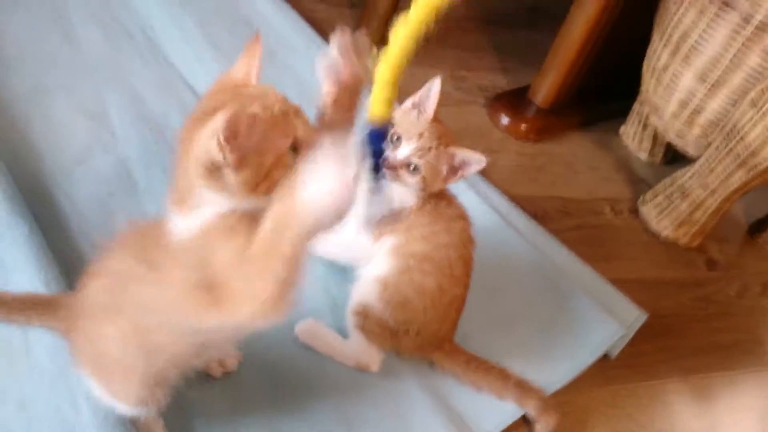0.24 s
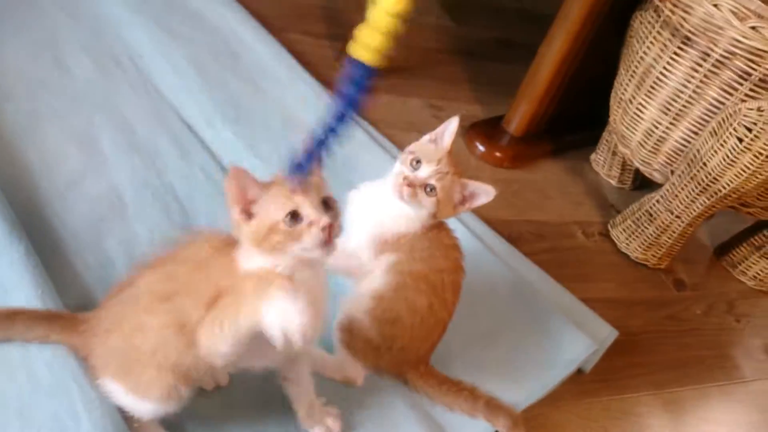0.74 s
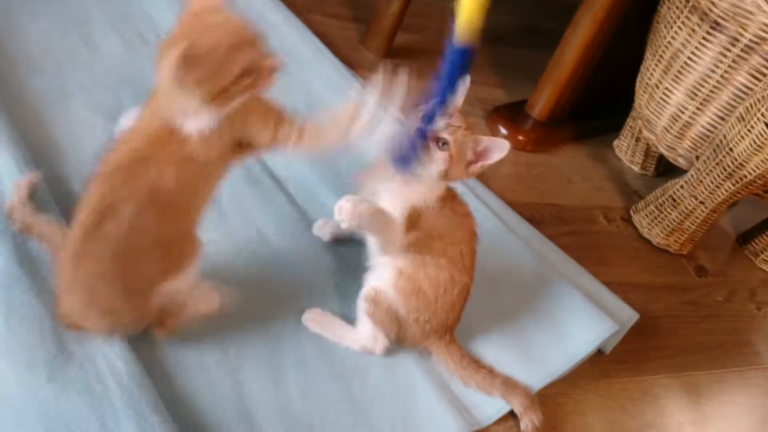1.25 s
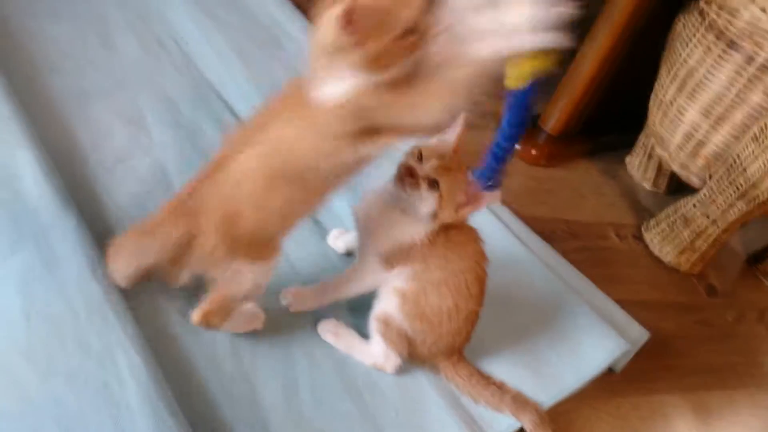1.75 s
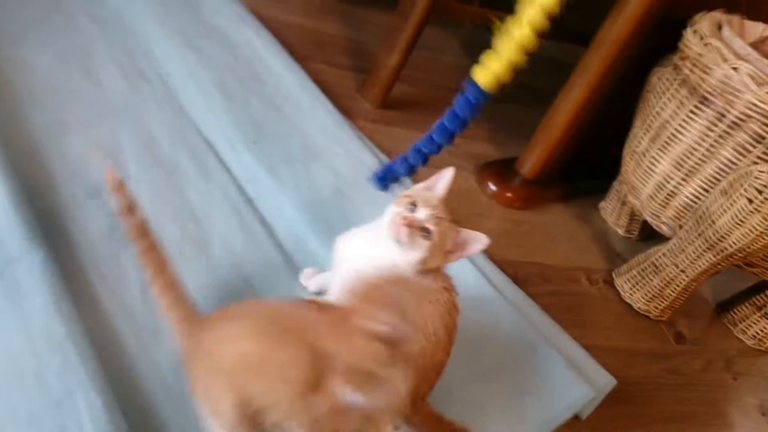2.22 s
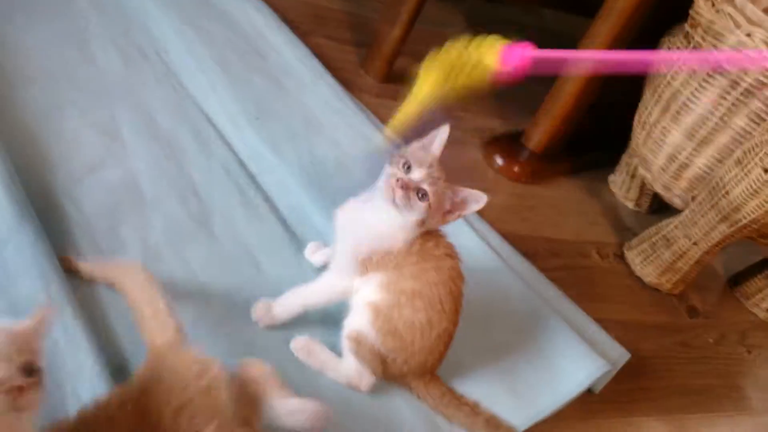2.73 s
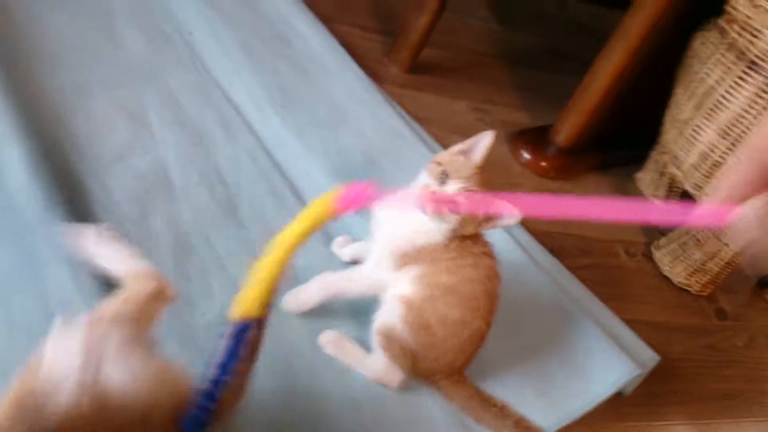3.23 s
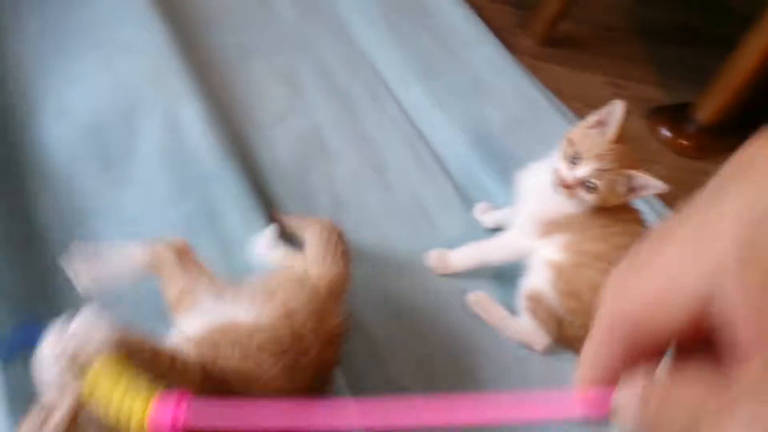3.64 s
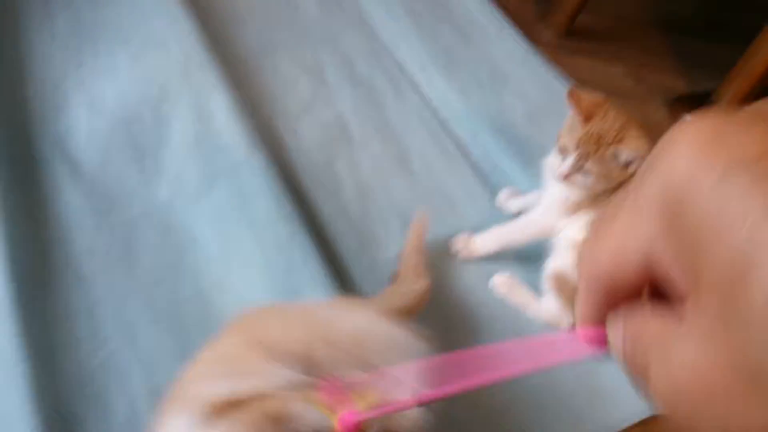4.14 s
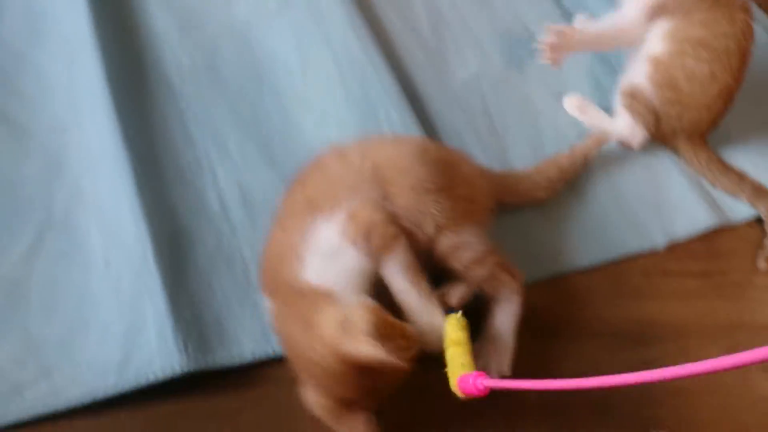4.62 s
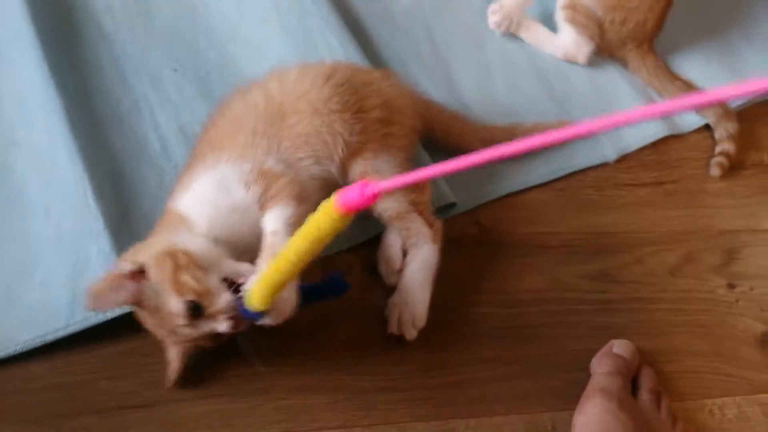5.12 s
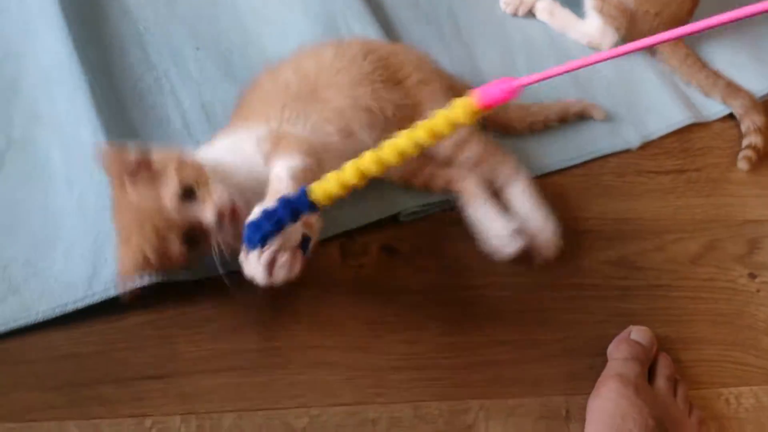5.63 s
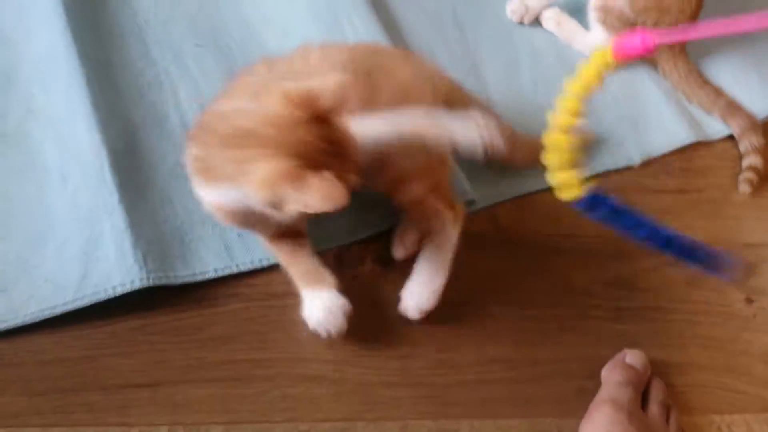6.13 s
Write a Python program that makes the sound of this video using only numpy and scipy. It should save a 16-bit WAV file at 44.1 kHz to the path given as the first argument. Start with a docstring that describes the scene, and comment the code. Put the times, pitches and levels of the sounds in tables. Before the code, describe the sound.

Close stereo pickup in a small, lively room. Faint cloth rustle, then a sudden loud cluster of hard, hollow toy knocks at half a second, another sharp clack near one second and weaker ones until two. After that, irregular claw ticks, brushing strokes of fur on cloth and soft low thumps on floorboards, with the busiest rustling near the end of the fifth second, then calmer.

```python
"""First comes a soft rustle of fur and cloth, and soon the hard cracks and hollow knocks of a wand toy.
Two kittens chase it on a cloth over a wooden floor, in a small, bare-sounding room.
Knocks and claw ticks are noise bursts plus short rings; rustle and scuffs are filtered grains of friction.
Soft landings ring the floorboards; low rumble, patter and steady air lie behind.
A close stereo microphone with a presence peak colours its two sides differently."""
import sys
import numpy as np
from scipy import signal
from scipy.fft import rfft, irfft, next_fast_len
from scipy.io import wavfile

SR = 44100
rng = np.random.default_rng(int(sys.argv[2]) if len(sys.argv) > 2 else 0)


def materialize(psi):
    """Save the field psi as 16-bit PCM at rate SR to the path in sys.argv[1].

    A 1-D psi becomes a single channel; in a 2-D psi each row is a channel.
    """
    bounded = np.clip(np.atleast_2d(psi).T, -1, 1)
    quanta = np.round(bounded * 32767).astype(np.int16)
    wavfile.write(sys.argv[1], SR, quanta)


N = 280917
TIME = np.arange(N) / SR  # seconds

# All levels in the tables are relative; positive left_right_db means louder on the left.

# Knocks of the toy: start_s, level_db, pitch_hz, crack_against_ring_db, left_right_db, room_level_db
TOY_KNOCKS = [(0.4875, -14.5, 1700, 2, 1, -5), (0.5002, -23.5, 1770, -6.5, -2, 2.5),
              (0.5173, -21, 1860, 3, 12, -6.5), (0.526, -23, 1940, -1.5, -16, -9),
              (0.534, -23.5, 1680, -7, 3, -9), (0.747, -41, 1746, -0.5, 7, 3),
              (0.9254, -26, 1980, 2, -9.5, -11), (0.955, -34, 1980, -11, 11, 3),
              (1.2107, -36.5, 1940, -11.5, -9, -4), (1.453, -33, 2020, -9.5, -2, -4.5),
              (1.6398, -29.5, 1735, -13, -6, -1.5), (1.9134, -42, 1780, -5, -5, 0)]
# Colour of the hard crack: frequency_hz, level_db
CRACK_COLOUR = [(250, -20.5), (450, -8.5), (800, -12), (1350, -18), (1650, -2.5), (2400, -0.5), (3300, 5),
                (4200, 2), (5300, 5.5), (6600, -4), (9000, -10), (14500, -8)]
KNOCK_RING_S = 0.0013  # time constant of both the rise and the decay


def knocks(upper_hz=2880, upper_db=-10, crack_room_db=10.5, hard_hz=17000, size=2048):
    """Each knock is a hard crack plus a short hollow ring, with its own pitch and echo pattern."""
    out, t = np.zeros((2, N)), np.arange(size) / SR
    hardest_db = max(row[1] + row[3] for row in TOY_KNOCKS)
    # so small a body radiates little below its own pitch
    small_body = signal.butter(4, 1500, "high", fs=SR, output="sos")
    for start_s, level_db, pitch_hz, crack_db, left_right_db, room_db in TOY_KNOCKS:
        phase = rng.uniform(0, np.pi / 2, (2, 1))
        low_mode = np.sin(2 * np.pi * pitch_hz * t + phase)
        high_mode = from_db(upper_db) * np.sin(2 * np.pi * upper_hz * t + phase)
        swell = np.exp(-t / KNOCK_RING_S) * (1 - np.exp(-t / KNOCK_RING_S))
        ring = signal.sosfilt(small_body, (low_mode + high_mode) * swell)
        ring = from_db(level_db - 3.5) * blow(ring)
        # gentler blows are duller
        softness_db = level_db + crack_db - hardest_db
        top_hz = np.clip(hard_hz * from_db(0.7 * softness_db), 5500, 19000)
        b, a = signal.butter(2, top_hz, fs=SR)
        crack = blow(signal.lfilter(b, a, contact(CRACK_COLOUR, decay_s=0.00093)))
        crack = from_db(level_db + crack_db - 2.5) * crack
        add(out, start_s, ring + crack, left_right_db)
        # the room gets a larger share of the crack
        add(out, start_s, room(from_db(room_db) * (ring + from_db(crack_room_db) * crack)))
    return out


RATTLE_MIDDLE_S, RATTLE_HALF_S, RATTLE_DB = 1.265, 0.035, -57


def rattles():
    """The dangling toy rattles: a loose run of tiny knocks, spread over four pitches."""
    chatter = 0
    for pitch_hz in np.geomspace(1700, 2050, 4):
        b, a = signal.iirpeak(pitch_hz, 10, fs=SR)
        chatter = chatter + signal.lfilter(b, a, fibres(per_s=80, spread_db=1, smooth=0))
    swell = np.exp(-((TIME - RATTLE_MIDDLE_S) / RATTLE_HALF_S) ** 2)
    return from_db(RATTLE_DB) * rms_one(chatter) * swell


# Claw ticks and snags that stand out of the rustle: start_s, level_db, treble_share_db, left_right_db
CLAW_TICKS = [(0.467, -37.5, 2, 3), (0.6708, -25, -4, 2.5), (1.028, -34, -3.5, -1), (1.494, -45, -5, 0),
              (1.587, -37, -9.5, 2), (1.64, -23.5, -11, -1), (1.7461, -31.5, -3.5, 4),
              (1.9898, -34.5, -1.5, 3), (2.107, -38.5, 13.5, 4), (2.205, -41, 0.5, -5),
              (2.282, -42, -2, 2.5), (2.419, -34, 1, -5), (2.503, -39, -19, -4), (2.874, -49, 10, 2),
              (2.9528, -34, -4, 4.5), (3.038, -37.5, -4, -5), (3.059, -39.5, 1, -4),
              (3.1489, -44, 11.5, -5), (3.1759, -34.5, -10, -10), (3.275, -25.5, -1, -2),
              (3.4975, -30, -10, -3), (3.594, -37, -11, -7), (3.693, -44, -5.5, -6), (3.93, -40.5, 7.5, -2),
              (4.0224, -33, 0, 7), (4.049, -31, -5.5, -6), (4.1656, -37.5, 7.5, -3),
              (4.2062, -39.5, 2.5, -4), (4.4212, -31.5, -16, 10), (4.552, -37, -17, -1),
              (4.6632, -36.5, -4, -2), (4.7851, -25.5, -6, 2), (4.808, -34, 4, 1), (4.883, -34, 1.5, -6),
              (4.923, -37, 0, 4), (5.096, -47, -9, 20), (5.176, -36, -16, 2), (5.198, -36.5, -5, 0),
              (5.229, -39.5, 8, 1.5), (5.2622, -30, -8, -3), (5.318, -40, -33, -6), (5.37, -37, -11, 0),
              (5.439, -39.5, -30, -3), (5.5643, -41.5, -25, -3), (5.7843, -38.5, -3, -2.5),
              (5.858, -38.5, -13, 11), (6.098, -42, -16, 8), (6.172, -41.5, 1, 2.5), (6.357, -44.5, 13, 3)]
# Colour of a claw's tap or pluck: frequency_hz, level_db
TICK_COLOUR = [(400, -20.5), (1500, -14), (2900, -11.5), (4300, -4.5), (5200, 0), (6200, -7.5), (9000, -62),
               (15000, -52)]
# Colour of a bright snap, also used for the crisp top of the rustle: frequency_hz, level_db
SNAP_COLOUR = [(2500, -46), (5500, -1), (7000, -7), (8500, -7.5), (10500, -12), (12500, -9.5),
               (15000, -18.5)]


def ticks(ring_hz=5050, ring_s=0.00053, ring_db=-2, dull_rings=0.18, size=2048):
    """Claws tap wood or pluck cloth with a tiny ping, plus a bright tearing snap; gives (taps, snaps)."""
    taps, snaps, t = np.zeros((2, N)), np.zeros((2, N)), np.arange(size) / SR
    for start_s, level_db, treble_db, left_right_db in CLAW_TICKS:
        ping_hz = ring_hz * (1 + 0.02 * rng.standard_normal())
        phase = rng.uniform(0, np.pi / 2, (2, 1))
        ping = blow(np.sin(2 * np.pi * ping_hz * t + phase) * t * np.exp(-t / ring_s))
        # a thread that is plucked and does not tear rings more purely
        ping = from_db(ring_db - dull_rings * treble_db) * ping
        tap = blow(ping + contact(TICK_COLOUR, decay_s=0.0015))
        snap = contact(SNAP_COLOUR, decay_s=0.0014)
        add(taps, start_s, from_db(level_db - 0.5) * tap, left_right_db)
        add(snaps, start_s, from_db(level_db + treble_db - 1.5) * snap, left_right_db)
    return taps, snaps


# Strokes of fur and paws over the cloth: start_s, length_s, level_db
CLOTH_STROKES = [(0.008, 0.13, -49), (0.308, 0.51, -52.5), (0.658, 0.26, -50.5), (1.383, 0.11, -52),
                 (1.747, 0.01, -45.5), (2.093, 0.16, -50.5), (2.274, 0.032, -43.5), (2.43, 0.02, -53),
                 (2.531, 0.16, -47), (2.784, 0.12, -50.5), (3.08, 0.075, -49), (3.148, 0.16, -43),
                 (3.405, 0.25, -51), (3.717, 0.043, -49.5), (3.915, 0.3, -47.5), (4.144, 0.21, -49),
                 (4.414, 0.027, -47), (4.515, 0.068, -47), (4.67, 0.098, -39.5), (4.766, 0.062, -38),
                 (4.889, 0.12, -41), (5.09, 0.22, -52.5), (5.224, 0.18, -53), (5.81, 0.088, -51),
                 (6.133, 0.0099, -54)]
# every stroke grips quickly, eases as the paw slows, then lets go
GRIP_S, EASE_DB_PER_S, LET_GO_DB_PER_S = 0.014, 33, 207
RESTING_RUB_DB = -63.5  # fur keeps stirring between the strokes


def rubbing_db():
    """How hard the cloth is rubbed at each moment: overlapping strokes add their power."""
    power = from_db(RESTING_RUB_DB) ** 2
    for start_s, length_s, level_db in CLOTH_STROKES:
        age = np.maximum(TIME - start_s, 0)
        fade_db = EASE_DB_PER_S * age + LET_GO_DB_PER_S * np.maximum(age - length_s, 0)
        grip = np.minimum(age / GRIP_S, 1)
        power = power + (grip * from_db(level_db - fade_db)) ** 2
    return 10 * np.log10(power)


# Colour of rubbed cloth: frequency_hz, level_db
CLOTH_COLOUR = [(300, -19.5), (1000, -14.5), (2000, -12), (3000, -7), (4300, -2.5), (5300, 1.5),
                (6600, -11.5), (9000, -20.5), (15000, -43)]
SNAGS_PER_S = 150  # at each pitch, under the hardest stroke
SNAGS_DB = -54  # average level


def rustle(crispness=1.0):
    """Cloth and fur rub as the kittens wrestle, crisp on top throughout; strong strokes snag more threads."""
    level_db = rubbing_db()
    weave, fuzz = (fibres(per_s=1400, spread_db=2.5, smooth=0.08) for _ in range(2))
    body = from_db(level_db - 2.5) * rms_one(colour(weave, CLOTH_COLOUR))
    # snagged threads have brief pitches: lone ticks at rest, a fine crackle under a hard stroke
    effort = from_db(level_db - level_db.max())
    threads = 0
    for pitch_hz in np.geomspace(2600, 8800, 10):
        b, a = signal.iirpeak(pitch_hz, 7, fs=SR)
        plucks = fibres(per_s=SNAGS_PER_S * effort, spread_db=2, smooth=0)
        threads = threads + signal.lfilter(b, a, plucks)
    snags = from_db(SNAGS_DB) * rms_one(colour(threads, CLOTH_COLOUR) * np.sqrt(effort))
    crisp = from_db(crispness * level_db - 7.0) * rms_one(colour(fuzz, SNAP_COLOUR))
    return body + snags + crisp


# Scuffs of paw and toy; the first row is the bright splash of the knock at 0.925 s:
# middle_s, half_length_s, level_db, centre_hz, width_octaves
SCUFFS_AND_SPLASH = [(0.945, 0.019, -48, 4360, 0.24), (2.62, 0.034, -65, 2660, 0.53),
                     (2.975, 0.026, -63.5, 8500, 0.1), (3.19, 0.013, -58, 2580, 0.59),
                     (3.435, 0.029, -57, 1700, 0.61), (3.955, 0.019, -54, 7900, 0.26),
                     (4.02, 0.0091, -54, 2700, 0.78), (4.195, 0.04, -61, 7760, 0.13),
                     (4.71, 0.075, -60.5, 2970, 0.93), (4.79, 0.037, -56, 3470, 0.61)]


def scuffs(size=16384):
    """Each scuff or splash is a swell of friction grains around one pitch."""
    out, grains = np.zeros((2, N)), fibres(per_s=1800, spread_db=1.5, smooth=0.25)
    t = (np.arange(size) - size / 2) / SR  # zero at the middle of the swell
    grid_hz = np.geomspace(100, 16000, 90)
    for k, (middle_s, half_s, level_db, centre_hz, octaves) in enumerate(SCUFFS_AND_SPLASH):
        hump_db = -20 * np.log10(1 + (np.log2(grid_hz / centre_hz) / octaves) ** 2)
        piece = grains[:, k * size:(k + 1) * size]
        hiss = rms_one(colour(piece, np.c_[grid_hz, hump_db]))
        add(out, middle_s + t[0], from_db(level_db + 10.5) * hiss * np.exp(-(t / half_s) ** 2))
    return out


# Paws and bodies landing: start_s, level_db, contact_sharpness_hz
LANDINGS = [(0.18, -54, 495), (0.489, -45, 1480), (0.786, -50.5, 159), (1.127, -48, 199.4),
            (1.37, -45.5, 320), (1.404, -40.5, 253), (2.001, -41.5, 130), (2.096, -46, 91),
            (2.205, -48, 80), (2.248, -44, 204), (2.338, -48, 90), (2.458, -45, 80), (2.526, -42, 112),
            (2.932, -39, 340), (3.276, -34, 300), (3.29, -40, 141), (3.72, -48, 590), (4.252, -38.5, 248),
            (4.28, -55, 215), (4.36, -42, 174), (4.423, -44, 300), (4.507, -40.5, 624), (5.768, -47, 150),
            (6.118, -46.5, 514), (6.165, -49, 400)]
# Ways the floorboards ring, before small random shifts: pitch_hz, level_db, time_to_fall_60_db_s
BOARD_MODES = [(71, -1.5, 0.12), (97, -2, 0.31), (137, -12, 0.081), (173.4, -2, 0.15), (239, -4, 0.11),
               (298, 3.5, 0.041), (451.5, -4.5, 0.16), (760, 2, 0.055)]
BOARD_RING_DB = 1  # ring of the boards against the push


def thumps(size=16384):
    """A soft push gives a short pulse and rings the boards; softer contact excites high modes less."""
    out, t = np.zeros((2, N)), np.arange(size) / SR
    for start_s, level_db, sharp_hz in LANDINGS:
        thud = 0
        for k, (mode_hz, mode_db, t60_s) in enumerate(BOARD_MODES):
            spot_db, detune = rng.normal(0, 2), rng.normal(1, 0.04)
            strength = from_db(mode_db + spot_db) / (1 + (mode_hz / sharp_hz) ** 2)
            tone = np.sin(2 * np.pi * mode_hz * detune * t)
            thud = thud + (-1) ** k * strength * from_db(-60 * t / t60_s) * tone
        age = np.pi * sharp_hz * t
        push = age * (2 - age) * np.exp(-age)
        landing = blow(blow(push) + from_db(BOARD_RING_DB) * blow(thud))
        add(out, start_s, from_db(level_db + 4.0) * landing)
    # the boards radiate little below their lowest mode
    return signal.sosfilt(signal.butter(2, 48, "high", fs=SR, output="sos"), out)


# Shifting weight on the floor: time_s, level_db
WEIGHT_SHIFTS = [(0, -58), (1, -62), (2.4, -62), (4.15, -60), (4.43, -55.5), (4.63, -59.5), (5.4, -62.5),
                 (6.37, -62)]
# Colour of the floor's rumble: frequency_hz, level_db
RUMBLE_COLOUR = [(25, -7), (45, -24), (70, -4.5), (100, 2.5), (160, -9.5), (400, -6.5), (800, -16),
                 (2000, -43)]
# Colour of the steady air of the room: frequency_hz, level_db
AIR_COLOUR = [(20, 6), (70, 2.5), (150, -5), (450, -24.5), (1000, -11.5), (3000, -11), (6000, -9),
              (15000, -20)]


def background():
    """The floor rumbles and patters under shifting weight, over the steady air of the room."""
    weight = from_db(np.interp(TIME, *np.transpose(WEIGHT_SHIFTS)))
    sway = from_db(2.5 * drift(25))
    rumble = from_db(-4.0) * sway * rms_one(colour(diffuse(N), RUMBLE_COLOUR))
    pads = fibres(per_s=45, spread_db=2, smooth=0.02)[0]  # one channel, so it sits in the middle
    pad_colour = [(50, -7.5), (130, 4.0), (420, -11.0), (900, -11.0), (2500, -24)]  # (Hz, dB)
    patter = from_db(-8.0) * rms_one(colour(pads, pad_colour))
    air = from_db(-61.0) * rms_one(colour(diffuse(N), AIR_COLOUR))
    return weight * (rumble + patter) + air


# How long the room rings: frequency_hz, time_to_fall_60_db_s
ROOM_DECAY = [(100, 0.29), (600, 0.49), (1800, 0.43), (5000, 0.38), (9000, 0.42), (15000, 0.14)]
EARLY_ECHO_SPREAD_DB = 3  # unevenness of the first echoes


def room(x, build_s=0.003, early_s=0.064, size=24576):
    """Uneven early echoes thicken into a tail fading at its own pace per band; each call differs."""
    t, hz = np.arange(size) / SR, np.fft.rfftfreq(size, 1 / SR)
    knots = t[::32]
    lumps = np.interp(t, knots, rng.standard_normal(len(knots)))
    unevenness_db = EARLY_ECHO_SPREAD_DB * lumps * np.exp(-t / early_s)
    echoes = rfft(diffuse(size) * from_db(unevenness_db))
    tail = 0
    for k, (_, t60_s) in enumerate(ROOM_DECAY):
        # neighbouring bands crossfade
        share = at_hz([(f, j == k) for j, (f, _) in enumerate(ROOM_DECAY)], hz)
        tail = tail + irfft(echoes * share) * from_db(-60 * t / t60_s)
    tail = tail * (1 - np.exp(-t / build_s))
    tail = tail / np.sqrt(np.sum(tail ** 2, axis=1, keepdims=True))
    return signal.fftconvolve(x, tail, axes=1)[:, :N]


# How alike left and right are in diffuse sound: frequency_hz, likeness_0_to_1
SIDE_LIKENESS = [(60, 0.33), (500, 0.51), (1500, 0.16), (3000, 0.1), (15000, 0)]


def diffuse(size):
    """Stereo noise, partly alike in the bass and unrelated in the highest treble."""
    mid, side = rfft(rng.standard_normal((2, size)))
    alike = np.clip(at_hz(SIDE_LIKENESS, np.fft.rfftfreq(size, 1 / SR)), 0, 1)
    return irfft(np.sqrt(1 + alike) * mid + np.sqrt(1 - alike) * side * [[1], [-1]], size)


def fibres(per_s, spread_db, smooth):
    """Threads catch and let go at random, in loose clumps, over an optional smooth hiss."""
    sizes = from_db(spread_db * np.minimum(rng.exponential(1, N), 2.5))
    caught = rng.random(N) < per_s / SR
    grains = rms_one(sizes * caught * rng.choice([-1, 1], (2, N)))
    clumps = from_db(1.5 * drift(110))
    return rms_one((grains + smooth * rng.standard_normal((2, N))) * clumps)


def contact(spectrum, decay_s, size=2048):
    """A spray of tiny slips that dies within milliseconds; each side hears its own pattern."""
    t = np.arange(size) / SR
    return blow(colour(rng.standard_normal((2, size)) * t * np.exp(-t / decay_s), spectrum))


def drift(rate):
    """Slow random wander of spread 1, with this many random points per second."""
    knots = rng.standard_normal(4096)
    return rms_one(np.interp(TIME * rate, np.arange(len(knots)), knots))


def colour(x, points):
    """Causal (minimum-phase) filter with the given dB spectrum."""
    length = x.shape[-1]
    size = 2 * next_fast_len(length // 2 + 2048)
    gain = from_db(at_hz(points, np.fft.rfftfreq(size, 1 / SR)))
    # folding the cepstrum forward in time makes the filter causal
    cepstrum = irfft(np.log(gain))
    cepstrum[1:size // 2] *= 2
    cepstrum[size // 2 + 1:] = 0
    return irfft(rfft(x, size) * np.exp(rfft(cepstrum)))[..., :length]


def at_hz(points, hz):
    """Read a table on a log-frequency axis."""
    f, value = np.transpose(points)
    return np.interp(np.log(np.maximum(hz, 1)), np.log(f), value)


def add(out, s, sound, pan_db=0):
    """Place a sound at a time and a side."""
    at = max(int(s * SR), 0)
    sound = sound * from_db([[pan_db / 2], [-pan_db / 2]])
    out[:, at:at + sound.shape[-1]] += sound[:, :max(N - at, 0)]


def blow(x):
    """Scale a short sound to the energy of one millisecond at level 1."""
    return x / np.sqrt(np.sum(x ** 2, axis=-1, keepdims=True) / (SR / 1000))


def rms_one(x):
    """Scale to an average (rms) level of 1."""
    return x / np.sqrt(np.mean(x ** 2) + 1e-20)


def from_db(db):
    """Decibels to gain."""
    return 10 ** (np.asarray(db) / 20)


def scene():
    """Every source is heard directly and through the room, over the background."""
    taps, snaps = ticks()
    # (sound, room level dB): of these, snaps echo the most; the knocks' cracks echo more still
    sources = [(taps, -6), (snaps, -0.5), (thumps(), -10), (rustle(), -6), (scuffs() + rattles(), -9)]
    mix = knocks() + background()  # knocks already carry their own echoes
    for sound, room_db in sources:
        mix = mix + sound + from_db(room_db) * room(sound)
    return mix


# Microphone's left against right sensitivity: frequency_hz, left_right_db
MIC_SIDES = [(60, 4), (150, 4), (500, 1.5), (1500, 5), (3000, 2.5), (4200, 2.5), (5300, -8.5), (7000, 4),
             (9000, 2.5), (12500, -6), (15000, -4)]
CUTOFF_HZ = 15400


def record(dry, peak_hz=5200, peak_width_hz=800, peak_gain=0.097):
    """The microphone's ports resonate and colour each side differently; the top is cut."""
    b, a = signal.iirpeak(peak_hz, peak_hz / peak_width_hz, fs=SR)
    heard = dry + peak_gain * signal.lfilter(b, a, dry)
    left = colour(heard[0], [(hz, db / 2) for hz, db in MIC_SIDES])
    right = colour(heard[1], [(hz, -db / 2) for hz, db in MIC_SIDES])
    top_cut = signal.ellip(10, 0.2, 80, CUTOFF_HZ, fs=SR, output="sos")
    return signal.sosfilt(top_cut, np.array([left, right]))


dry = scene()
out = record(dry)
materialize(out)
```